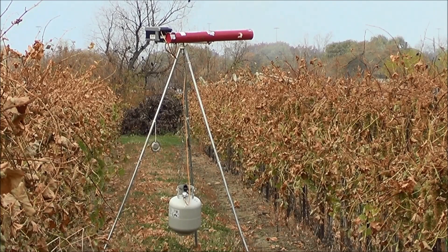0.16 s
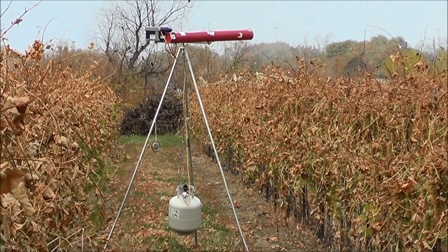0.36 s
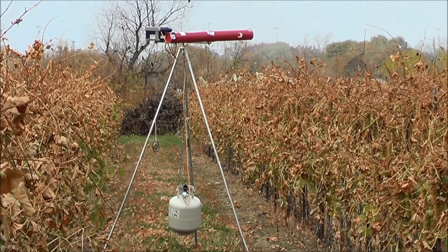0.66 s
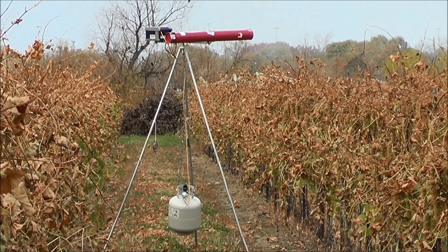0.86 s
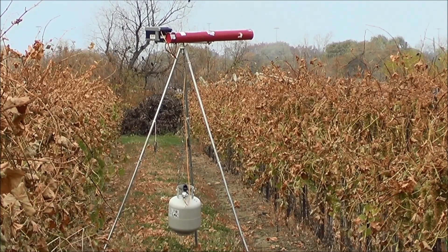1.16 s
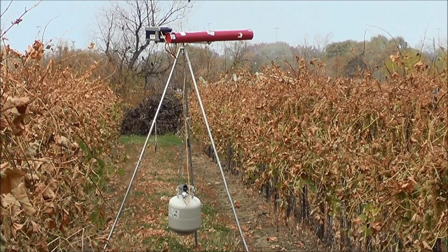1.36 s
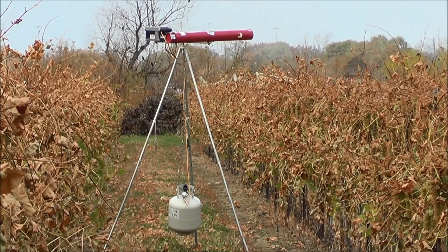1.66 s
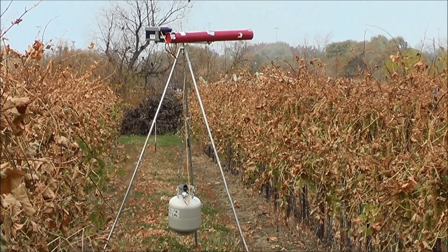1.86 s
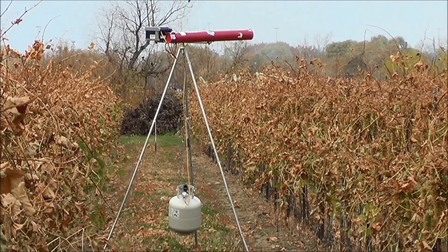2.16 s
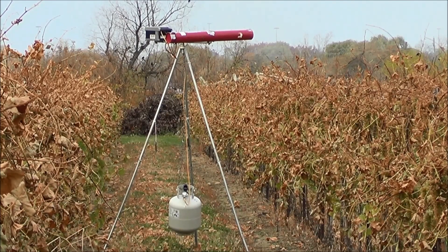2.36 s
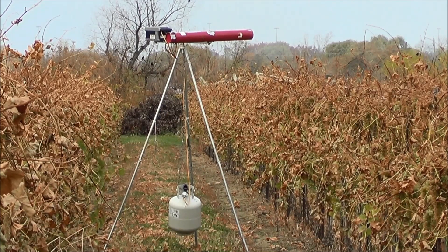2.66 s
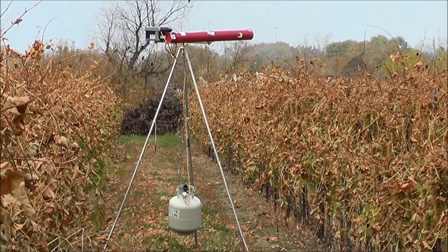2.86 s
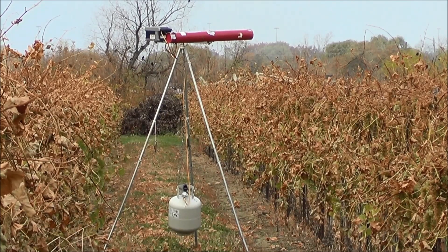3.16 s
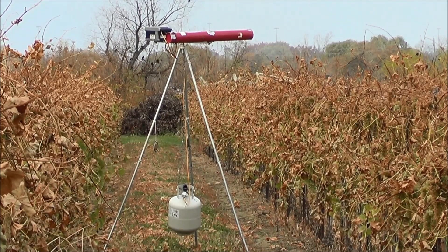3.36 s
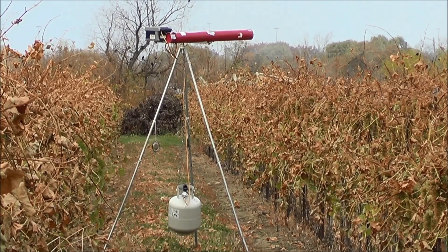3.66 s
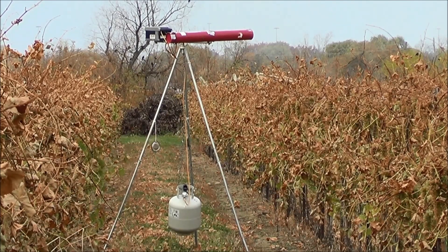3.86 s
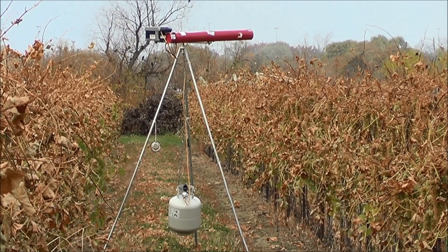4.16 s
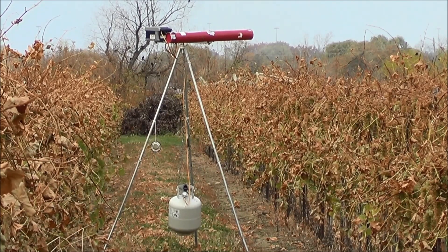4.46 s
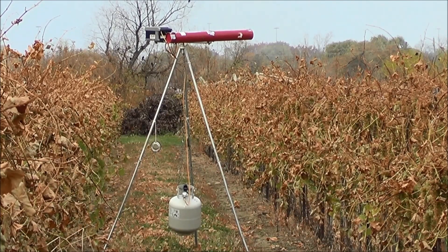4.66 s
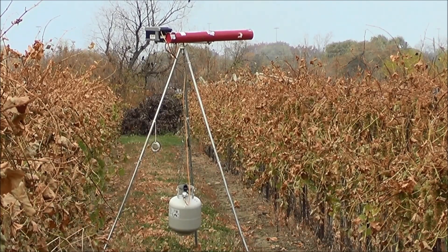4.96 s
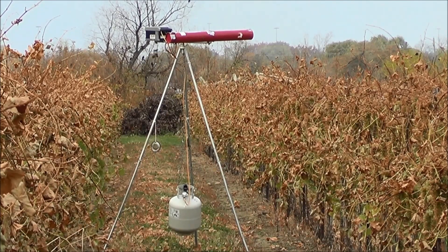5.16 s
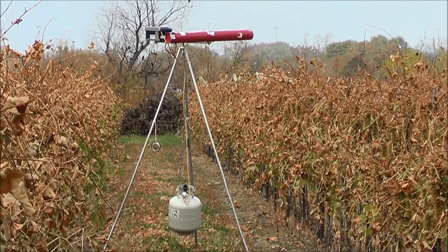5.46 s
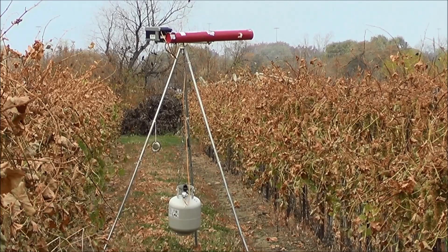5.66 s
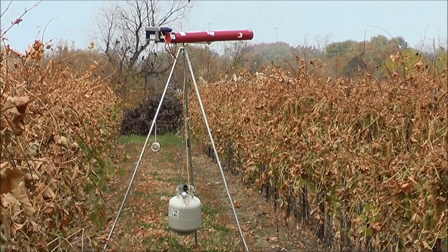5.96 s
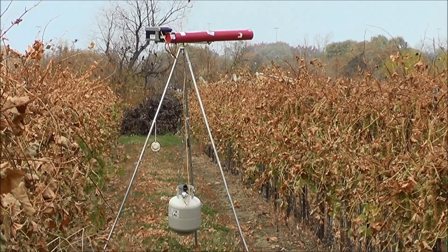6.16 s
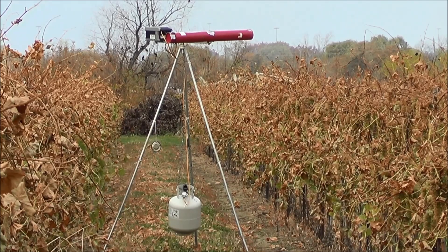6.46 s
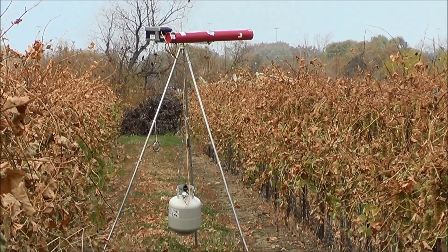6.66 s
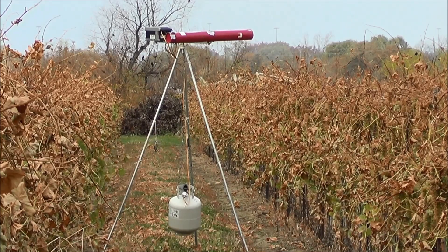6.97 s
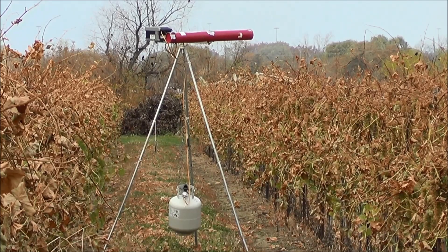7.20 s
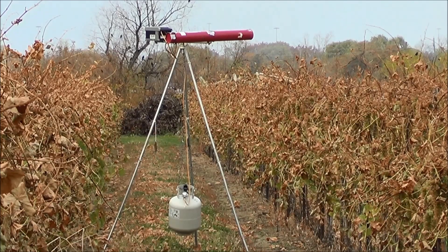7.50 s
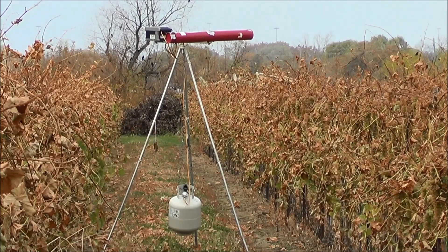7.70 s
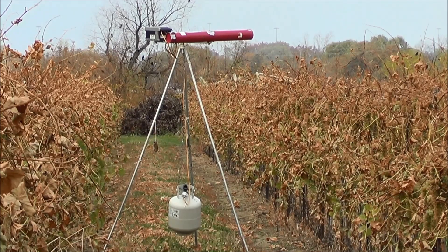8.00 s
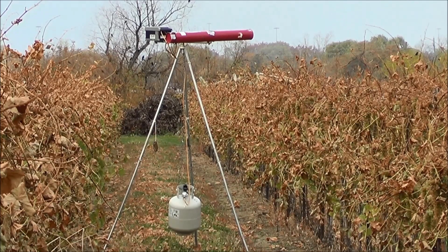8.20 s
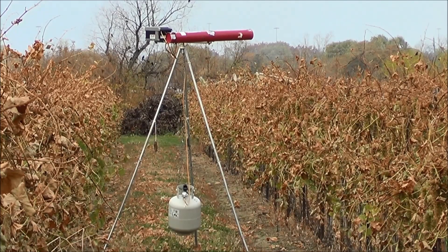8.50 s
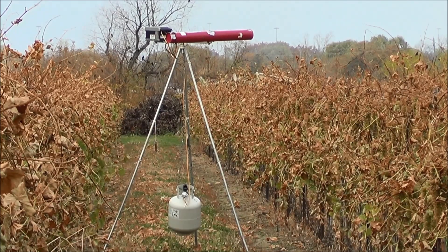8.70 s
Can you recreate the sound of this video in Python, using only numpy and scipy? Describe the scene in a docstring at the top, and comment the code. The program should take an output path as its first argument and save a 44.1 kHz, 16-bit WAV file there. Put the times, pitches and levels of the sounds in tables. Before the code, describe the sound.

Open field among dry crop rows, microphone some distance from a gas bird-scaring cannon. Soft far-road rush, thin hiss and small birds chirping come first. A sharp hollow bang then bursts out, answered at once by stronger slapping echoes leaning left and a fading grainy roll. Over two seconds later a second bang comes, its dense echoes leaning right. Birds resume, livelier toward the end.

```python
"""In a vineyard, a gas cannon fires twice over far road noise, a small flock of birds and a passing drone.
Each shot is a short ringing pulse. Walls and tree lines send back single echoes, and the vine rows
scatter it into a grainy roll of many tiny rings with a low boom. Road and hiss are shaped noise; birds,
drone and one whistling echo are gliding sines. The camera adds hiss and a thin high whistle."""
import sys
import numpy as np
from scipy import signal
from scipy.io import wavfile

SR = 44100
rng = np.random.default_rng(int(sys.argv[2]) if len(sys.argv) > 2 else 0)


def dump_mix(stems):
    """Bounce the given channels to the path in sys.argv[1] as a 16-bit WAV at rate SR."""
    frames = np.atleast_2d(stems).T  # one column per channel
    limited = np.clip(frames, -1, 1)  # hard clip at full scale
    pcm = np.round(limited * 32767).astype(np.int16)
    wavfile.write(sys.argv[1], SR, pcm)


N = 389844
T = np.arange(N) / SR   # time of every sample [s]

# How alike left and right noise are: (frequency [Hz], likeness [0-1])
LIKENESS = [(30, 0.96), (130, 1), (380, 0.48), (700, 0.75), (3000, 0.71), (8000, 0.84), (15000, 1)]
# Far road, balance of its pitches: (frequency [Hz], relative density [dB per Hz])
ROAD_COLOUR = [(20, -46), (50, -16.5), (100, -10), (200, -8), (400, -12), (560, -9.5), (750, -4), (1000, 2),
               (1300, -7), (1600, -8.5), (2500, -9), (3100, -13), (4500, -15.5), (6000, -27)]
# Far road, change from its base level: (time [s], low roar [dB], tyre hiss [dB])
ROAD_SWELLS = [(0, 0.5, 0.5), (1.4, 1, -1), (2.0, 5.5, 0), (2.45, 6, 1), (2.7, -1, -3), (4.1, 0, 1.5),
               (4.8, 2.5, 0), (5.35, 9, 3), (5.7, -1, 4), (6.8, -2, 1.5), (8.4, -0.5, 1.5),
               (8.84, 0.5, 2.5)]
# Centres of the road's three swelling regions, roar, tyres and top: (frequency [Hz])
SWELL_HZ = [480, 1130, 3240]
ROAD_DB = -47
TOP_FOLLOWS = 0.48   # share of the tyre hiss swell, in dB, that reaches the top region

# Camera hiss, balance of its pitches: (frequency [Hz], relative density [dB per Hz])
HISS_COLOUR = [(2650, -23), (4500, -26), (5980, -11.5), (6700, -4.5), (14200, -7.5), (15500, -9)]
HISS_DB = -62.5
# Microphone housing resonances: (frequency [Hz], width [Hz], level relative to HISS_DB [dB])
HOUSING = [(2446, 420, 1.5), (3641, 240, 1), (6600, 330, -8.5)]
# Camera whistle: picture line tone, spacing of its side tones, distance of its twin; then the top cut
LINE_HZ, FIELD_HZ, THROB_HZ, CUTOFF_HZ = 15734.27, 59.94, 13.01, 15800

# Nearer bird notes:
# (start [s], length [s], first pitch [Hz], last pitch [Hz], level before panning [dB], buzz [0-1])
BIRD_NOTES = [(.08, .04, 3550, 3400, -55, .3), (0.13, .105, 4800, 4470, -59, 0.02),
              (.272, .02, 4950, 4350, -57, .1), (.405, .03, 3500, 3250, -56, 0),
              (0.749, .06, 3750, 4250, -54, 1), (.985, 0.04, 5750, 4950, -55, 1),
              (.99, 0.054, 3720, 3550, -59, 0), (1.067, .06, 4400, 4140, -51, 1),
              (1.114, .065, 4250, 3730, -46.5, 0.8), (1.12, 0.11, 3300, 3280, -60, 0),
              (1.235, .055, 4400, 4120, -55, 0), (1.39, 0.07, 5250, 4900, -54.5, 1),
              (1.46, 0.27, 4650, 4280, -51.5, .33), (1.76, .035, 3500, 3450, -56, .3),
              (1.82, 0.044, 4200, 4870, -54, .5), (2.14, .02, 4300, 4800, -54, .5),
              (2.192, .13, 4700, 4250, -59.5, 0.06), (4.03, .06, 4450, 4300, -62, 0),
              (4.09, .04, 4280, 4880, -61, 0.1), (4.45, 0.07, 4720, 4520, -57.5, 0.5),
              (4.53, 0.085, 4400, 4430, -58, 0.2), (4.585, .075, 4740, 4900, -60, .2),
              (4.655, 0.09, 4700, 4380, -56, .2), (4.66, .04, 5000, 4720, -58, .4),
              (4.775, 0.1, 4250, 5200, -58.5, 0.35), (4.802, .07, 3330, 3300, -56.5, 0),
              (4.89, .14, 4870, 4700, -59.5, 0), (5.12, 0.087, 3742, 3400, -57.5, 0),
              (5.212, .06, 5100, 4900, -63, 0), (5.488, .08, 6700, 7600, -64, .3),
              (5.66, .07, 4900, 4250, -64, 0), (7.23, .035, 6800, 7500, -61, 1),
              (7.265, .04, 4980, 4850, -58, .2), (7.3, .025, 4500, 3700, -58, .6),
              (7.439, 0.17, 3120, 3250, -57, 0), (7.46, .17, 2850, 2980, -59, 0),
              (7.505, .035, 5150, 4950, -55, .3), (7.545, 0.1, 4800, 4500, -55, 0.1),
              (7.75, .05, 5300, 4670, -59, 0), (7.94, 0.039, 3500, 3300, -56, 0),
              (7.975, .085, 3280, 3420, -56, 0), (7.958, 0.19, 3060, 3430, -58, 0.1),
              (7.951, 0.047, 4250, 4200, -53.5, 1), (8.08, .02, 4300, 3800, -52, 1),
              (8.269, 0.039, 4100, 4400, -52.5, 0.5), (8.303, 0.097, 4410, 4050, -49.5, 0.15),
              (8.349, .025, 3670, 3130, -52, .6), (8.402, 0.054, 4420, 4200, -56, 0),
              (8.66, 0.19, 4250, 3690, -53, 0), (8.487, 0.031, 4340, 3660, -53, .6),
              (8.7, .09, 4750, 5050, -58, 0.04), (8.779, 0.033, 4100, 3900, -50, 1)]
# Base loudness of the far flock: (time [s], change [dB])
FLOCK_LOUDNESS = [(0, -2.5), (2.2, 1), (2.5, -5), (3.9, -4), (4.3, -2), (6.8, 2), (7.1, 3.5), (8.84, 7)]
# Trees return the birds: (delay [s], level [dB])
BIRD_ECHOES = [(.021, -11.5), (.047, -14), (.083, -15.5)]
NOTE_RISE, NOTE_FALL = 0.28, 0.22   # shares of a note's length
NOTE_START_DB, NOTE_END_DB = -4.5, -7   # relative to the middle of the note
GLIDE_EARLY = .8   # below 1, a glide is steepest at its start

# The two shots: (fired [s], roll has died [s])
SHOTS = [(3.344, 4.5), (5.762, 6.9)]
# Low thumps in the echoes: (time [s], peak before filtering [dB], frequency [Hz])
THUMPS = [(3.343, -28.5, 171), (3.734, -26, 130), (4.355, -48, 127), (5.762, -29, 221), (5.859, -23, 178),
          (5.932, -30, 182), (6.219, -29, 143), (6.467, -38, 125)]
THUMP_T60_S = 0.044   # time to die by 60 dB
# Swells of each shot's roll, from nearer and farther blocks of vines and trees; one list per shot:
# (peak time [s], level before mixing [dB], rise [s per 20 dB], fall [s per 60 dB], centre [Hz],
#  treble relative to level [dB], boom relative to level [dB])
ROLL_SWELLS = [
    [(3.35, -29, .005, 0.15, 1150, -9.5, -7.5), (3.375, -30, .03, 0.49, 1250, -8, -20),
     (3.58, -31, 0.07, 0.17, 1820, -15, -16), (3.65, -30.5, .07, .2, 1340, -14.5, -17),
     (3.77, -42.5, 3, 0.9, 1400, -13, -12)],
    [(5.771, -25.5, 0.006, 0.36, 1300, -20, -14.5), (5.81, -24.5, .08, 0.56, 1630, -18, -19),
     (5.975, -30, .15, 0.56, 1350, -18, -17), (6.13, -44.5, 0.02, 2.3, 1300, -12, -11.5),
     (6.4, -46.5, 0.4, 1, 1250, -12.5, -19), (6.54, -46.5, 0.26, .7, 1280, -12, -20)],
]
# Broad part of the roll: (frequency [Hz], level added to each swell's treble [dB])
ROLL_TREBLE = [(300, -48), (900, -8.5), (3000, 3.5), (5000, -0.5), (8000, -9.5), (11000, -21)]
ROLL_SIDE_SHARE = 0.68   # the roll leans to the side of the echoes, but less
# Reports and their single echoes:
# (time [s], pulse peak before filtering [dB], ring [Hz], crack relative to peak, before its +7 dB lift [dB])
ECHOES = [(3.345, -11.5, 1020, -7), (3.479, -22, 1570, -20), (3.533, -19.5, 2220, -28),
          (3.538, -19, 1530, -26), (3.576, -8.5, 1510, -21), (3.581, -19, 1650, -30),
          (3.611, -24.5, 800, -22.5), (3.624, -22.5, 931, -30), (3.64, -24, 1000, -25),
          (3.647, -19, 1000, -30), (3.655, -17, 1100, -33), (3.667, -23, 1500, -30),
          (3.671, -19, 1400, -22), (3.7365, -12.5, 970, -34), (3.737, -12.5, 2360, -36),
          (3.742, -19, 1500, -27), (3.754, -16, 1680, -39), (3.806, -29.5, 1540, -29),
          (4.36, -21, 1340, -40), (4.402, -31, 1160, -24), (5.763, -21.5, 940, -8),
          (5.767, -10.5, 990, -25), (5.774, -15, 1600, -24), (5.7875, -10, 1880, -23),
          (5.803, -12, 1860, -22), (5.806, -11, 1740, -26), (5.818, -15, 1500, -20),
          (5.822, -15, 1800, -25), (5.86, -24, 1580, -9), (5.865, -25, 1300, -8), (5.87, -24, 1600, -10),
          (5.8895, -12.5, 1730, -13.5), (6.201, -33, 1110, -23), (6.223, -34, 1240, -6),
          (6.306, -31, 835, -20), (6.575, -21.5, 1210, -33), (6.615, -29, 1090, -27)]
# Side from which the echoes return: (time [s], left minus right [dB])
ECHO_SIDE = [(3.345, 3), (3.5, 7.5), (3.8, 8), (4.4, 6), (5.76, -7), (5.8, -11.5), (5.9, -9), (6.2, -2),
             (6.35, -2), (6.57, 4.5)]

# A far engine note: (time [s], frequency [Hz], level [dB])
DRONE = [(3.8, 204, -69), (4.0, 204, -64.5), (5.0, 196.8, -64.5), (5.7, 192.4, -66.5)]
# One echo returns as a short whistle that falls, then turns up a little:
# (time [s], frequency [Hz], level before panning [dB])
ROW_WHISTLE = [(4.25, 1960, -57), (4.286, 1510, -42), (4.31, 1600, -48)]


def from_db(db):
    """Decibels to gain."""
    return 10 ** (np.asarray(db) / 20)


def rms_one(x):
    """Scale the whole array to an average strength (rms) of 1."""
    return x / np.sqrt(np.mean(x ** 2) + 1e-20)


def in_time(rows, t=T):
    """Table columns joined by straight lines in time."""
    s, *columns = np.transpose(rows)
    return [np.interp(t, s, column) for column in columns]


def at_hz(points, hz):
    """Read a table at a frequency, joining its points evenly by pitch (log frequency)."""
    table_hz, values = np.transpose(points)
    return np.interp(np.log(hz), np.log(table_hz), values)


def sides(pan_db):
    """Left and right gains for a level difference; positive leans left."""
    half_db = np.divide(pan_db, 2)
    return from_db([half_db, -half_db])


def spread(mid, side, alike):
    """Stereo from two independent noises; the more alike, the less the sides differ."""
    return np.sqrt(1 + alike) * mid + np.sqrt(1 - alike) * side * [[1], [-1]]


def drift(rate, size=N):
    """Slow random wandering with unit spread; a higher rate [Hz] wanders faster."""
    step, settle = 40, 2000   # made at every 40th sample; the filter's start-up is thrown away
    r = np.exp(-2 * np.pi * rate * step / SR)
    white = rng.standard_normal(size // step + settle + 2)
    slow = signal.lfilter([1], [1, -2 * r, r * r], white)[settle:]
    return np.interp(np.arange(size) / step, np.arange(len(slow)), rms_one(slow))


def ring(clicks, hz, t60):
    """Each click sets a dying sine ringing; a click of 1 gives a height of about 1."""
    r, w = from_db(-60 / (t60 * SR)), 2 * np.pi * hz / SR
    return signal.lfilter([0, np.sin(w)], [1, -2 * r * np.cos(w), r * r], clicks + 1e-18)


def band(x, low_hz, high_hz):
    """Keep the sound between two frequencies (Butterworth band-pass)."""
    return signal.sosfilt(signal.butter(2, [low_hz, high_hz], "band", fs=SR, output="sos"), x)


def add(out, s, sound):
    """Mix a sound into the stereo mix from time s."""
    i = round(s * SR)
    out[:, i:i + sound.shape[-1]] += sound[..., :N - i]


def banded_noise(spectrum, patchy_db, swells_db=()):
    """Third-octave noise bands, each flickering on its own; swells lift the bands near them."""
    low_end, high_end = spectrum[0][0], spectrum[-1][0]
    edges = low_end * 2 ** (np.arange(int(3 * np.log2(high_end / low_end)) + 2) / 3)
    white = rng.standard_normal((2, 2, N))   # neighbouring bands use different noise
    out, power = 0, 0
    for k, (low, high) in enumerate(zip(edges, np.minimum(edges[1:], 17000))):
        mid, side = band(white[k % 2], low, high)
        hz = np.sqrt(low * high)
        swell_db = 0
        for db, centre_hz in zip(swells_db, SWELL_HZ):
            swell_db = swell_db + db * np.exp(-np.log2(hz / centre_hz) ** 2 / .5)
        steady = from_db(at_hz(spectrum, hz))
        power += steady ** 2 * np.mean(mid ** 2 + side ** 2)
        gain = steady * from_db(swell_db + patchy_db * drift(9.5))
        out = out + gain * spread(mid, side, at_hz(LIKENESS, hz))
    return out / np.sqrt(power)   # unit rms before swells and flicker


def note(rows, rough_db, waver, rate):
    """A gliding sine with uneven level and pitch, faded at both ends."""
    start = rows[0][0]
    size = max(round((rows[-1][0] - start) * SR), 100)
    hz, level_db = in_time(rows, start + T[:size])
    phase = 2 * np.pi * np.cumsum(hz * (1 + waver * drift(rate, size=size))) / SR
    fade = signal.windows.tukey(size, min(1, 0.0032 * SR / size))
    uneven = from_db(level_db + rough_db * drift(rate, size=size))
    return np.sqrt(2) * uneven * fade * np.sin(phase)


def far_road():
    """Far traffic is broad noise whose low roar and tyre hiss swell separately."""
    roar_db, tyres_db = in_time(ROAD_SWELLS)
    swells_db = (roar_db, tyres_db, TOP_FOLLOWS * tyres_db)
    road = banded_noise(ROAD_COLOUR, patchy_db=1.68, swells_db=swells_db)
    return from_db(ROAD_DB) * road * sides(-1.74)[:, None]


def camera_hiss():
    """High noise, with narrow bands of steady noise filling the microphone housing's resonances."""
    out = from_db(HISS_DB) * banded_noise(HISS_COLOUR, patchy_db=1.5)
    for hz, width_hz, lift_db in HOUSING:
        white = rng.standard_normal((2, N))
        mid, side = rms_one(band(white, hz - width_hz / 2, hz + width_hz / 2))
        out = out + from_db(HISS_DB + lift_db) * (mid + 0.45 * side * [[1], [-1]])
    return out


def camera_whistle(level_db=-58, twin_db=-4):
    """The picture line tone leaks in with side tones at the field rate; a twin just above makes it throb."""
    tone = np.sin(2 * np.pi * LINE_HZ * T)
    tone = tone - from_db(twin_db) * np.sin(2 * np.pi * (LINE_HZ + THROB_HZ) * T)
    for k in range(1, 11):
        side_tone = np.sin(2 * np.pi * (LINE_HZ - k * FIELD_HZ) * T + k * k)
        tone = tone + from_db(-14.5 - 1.5 * k) * side_tone
    haze = from_db(-13) * rms_one(band(rng.standard_normal(N), 15300, 15900))   # faint noise round the tone
    return from_db(level_db) * (tone + haze)


def birds(flock_db=-70, count=420):
    """Nearer notes glide, swell and fade, whistled or buzzy; a far flock twitters short slurs at random."""
    out = np.zeros((2, N))
    share = np.array([0, NOTE_RISE, 1 - NOTE_FALL, 1])
    shape_db = np.array([NOTE_START_DB, 0, 0, NOTE_END_DB])
    for s, length, from_hz, to_hz, level_db, buzz in BIRD_NOTES:
        hz = from_hz + (to_hz - from_hz) * share ** GLIDE_EARLY
        rows = np.transpose([s + length * share, hz, level_db + shape_db])
        # buzz is a faster, stronger unevenness of level and pitch
        call = note(rows, rough_db=1.7 + 1.9 * buzz, waver=0.0081 + 0.025 * buzz, rate=30 + 320 * buzz ** 2)
        add(out, s, call * sides(-3.0)[:, None])
    for when, pitch, slur, length, loud, pan in rng.random((count, 6)):
        s, hz = when * (N / SR - .02), 3200 + 1900 * pitch
        end_s, end_hz = s + 0.0123 + 0.022 * length ** 2, hz * (.85 + .25 * slur)
        level_db = flock_db + in_time(FLOCK_LOUDNESS, s)[0] + 4 * loud
        call = note([(s, hz, level_db), (end_s, end_hz, level_db)], rough_db=5.0, waver=.025, rate=90)
        add(out, s, call * sides(6 * pan - 5)[:, None])
    direct = out.copy()
    for k, (delay_s, echo_db) in enumerate(BIRD_ECHOES):
        add(out, delay_s, from_db(echo_db) * direct[::(-1) ** (k + 1)])   # every other echo swaps sides
    return out


def thumps():
    """The low push of the blast: a few slow swings that die quickly."""
    out, t = np.zeros((2, N)), T[:8000]
    for s, peak_db, hz in THUMPS:
        swing = (1 - np.exp(-t * hz * 2.0)) ** 2 * from_db(-60 * t / THUMP_T60_S)
        add(out, s, from_db(peak_db) * swing / swing.max() * np.sin(2 * np.pi * hz * t))
    return band(band(out, 70, 600), 70, 600)


def rolls(per_s=30000, uneven_db=3.0, cycles=23.0, alike=0.67, octaves=0.48):
    """Many small uneven reflections ring briefly, mostly near their swell's pitch, over a low noise boom."""
    out, pitches = np.zeros((2, N)), np.geomspace(330, 11000, 26)
    for (fired, died), rows in zip(SHOTS, ROLL_SWELLS):
        size = round((died - fired) * SR)
        t = fired + T[:size]
        peak_s, level_db, rise_s, t60, centre_hz, treble_db, boom_db = np.transpose(rows)
        since = t - peak_s[:, None]
        shape_db = np.minimum(20 * since / rise_s[:, None], -60 * since / t60[:, None])
        power = from_db(2 * (level_db[:, None] + shape_db))   # one row for each swell
        sizes = from_db(uneven_db * np.minimum(rng.exponential(1, (2, size)), 5))
        sizes = sizes * rng.choice([-1, 1], (2, size))
        struck = rng.random((2, size)) < per_s / SR
        clicks = sizes * struck * from_db(1.4 * drift(62, size=size))
        dealt = rng.integers(0, len(pitches), (2, size))   # each click gets one pitch
        roll = 0
        for k, hz in enumerate(pitches):
            near_centre = np.exp(-(np.log2(hz / centre_hz) / octaves) ** 2)
            gain = near_centre + from_db(treble_db + at_hz(ROLL_TREBLE, hz))
            rings = rms_one(ring(clicks * (dealt == k), hz, cycles / hz))
            roll = roll + np.sqrt(gain ** 2 @ power) * rings
        mid, side = roll * from_db(-7.5)
        boom = rms_one(band(rng.standard_normal(size), 102, 219))
        boom = np.sqrt(from_db(2 * boom_db) @ power) * boom
        lean = sides(ROLL_SIDE_SHARE * in_time(ECHO_SIDE, t)[0])
        add(out, fired, lean * spread(mid, side, alike) + boom)
    return band(out, 75, 13000)


def echoes(near_cycles=7.0, more_at_1_s=20.0, alike=0.81):
    """Each arrival: a rounded pulse that rings a few cycles, a short smear of noise and a bright crack."""
    body, top, t = np.zeros((2, N)), np.zeros((2, N)), T[:2000]
    noises = rng.standard_normal((len(ECHOES), 4, 2000))
    for (s, peak_db, hz, crack_db), noise in zip(ECHOES, noises):
        late = min(s - fired for fired, _ in SHOTS if fired < s + .01)   # time since the latest shot
        cycles = near_cycles + more_at_1_s * late ** 2   # far reflectors are deeper: longer, duller pulses
        swing = (1 - np.exp(-t * hz * 16 / cycles)) ** 2 * from_db(-60 * t * hz / cycles)
        swing = swing / swing.max()
        # two stereo pairs, each partly shared between the sides: one for the smear, one for the crack
        noise = np.sqrt(alike) * noise[[0, 0, 1, 1]] + np.sqrt(1 - alike) * noise[[2, 3, 3, 2]]
        smear = rms_one(band(noise[:2], 390, 3200 / (1 + 1.1 * late)))
        smear = from_db(-6.5) * swing ** 0.67 * smear
        crack = from_db(crack_db + 7) * from_db(-60 * t / 0.0098) * noise[2:]
        gain = from_db(peak_db) * sides(in_time(ECHO_SIDE, s)[0])[:, None]
        add(body, s + 0.000795, gain * (swing * np.sin(2 * np.pi * hz * t) + smear))
        add(top, s + .0009, gain * crack)
    return band(band(body, 400, 3350), 400, 3350) + band(band(top, 2600, 8300), 2600, 8300)


def drone():
    """A far engine note: one low sine that sinks in pitch and wavers slightly."""
    out = np.zeros((2, N))
    add(out, DRONE[0][0], note(DRONE, rough_db=2, waver=.003, rate=6))
    return out


def row_whistle():
    """One echo returns as a short gliding whistle, here a sine leaning left."""
    out = np.zeros((2, N))
    whistle = note(ROW_WHISTLE, rough_db=3.5, waver=.004, rate=65)
    add(out, ROW_WHISTLE[0][0], whistle * sides(5.9)[:, None])
    return out


def scene():
    """Road, birds, cannon and drone at the microphone, with the camera's hiss."""
    background = far_road() + camera_hiss() + birds()
    cannon = thumps() + rolls() + echoes() + row_whistle()
    return background + cannon + drone()


def record(dry):
    """The camera adds its whistle; the top is cut steeply."""
    top_cut = signal.ellip(14, .3, 80, CUTOFF_HZ, fs=SR, output="sos")
    return signal.sosfilt(top_cut, dry + camera_whistle())


dry = scene()
out = record(dry)
dump_mix(out)
```